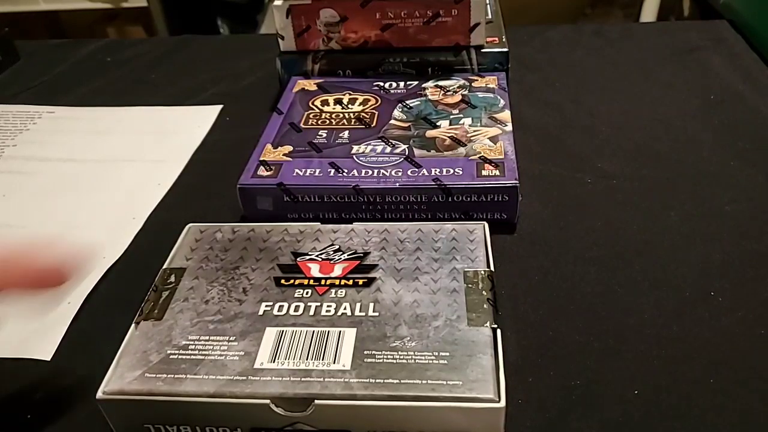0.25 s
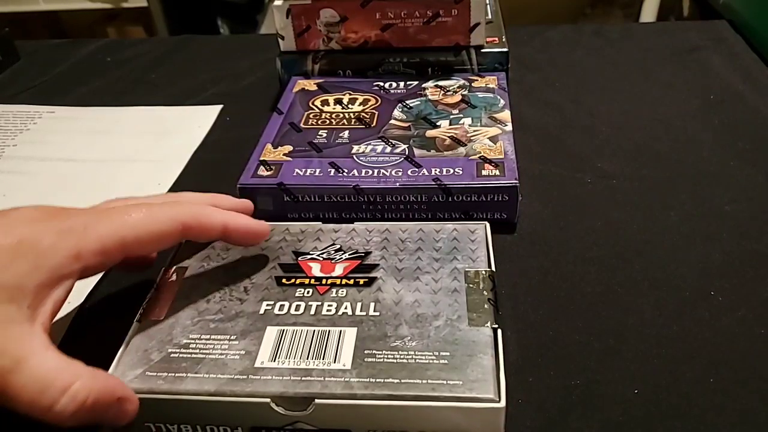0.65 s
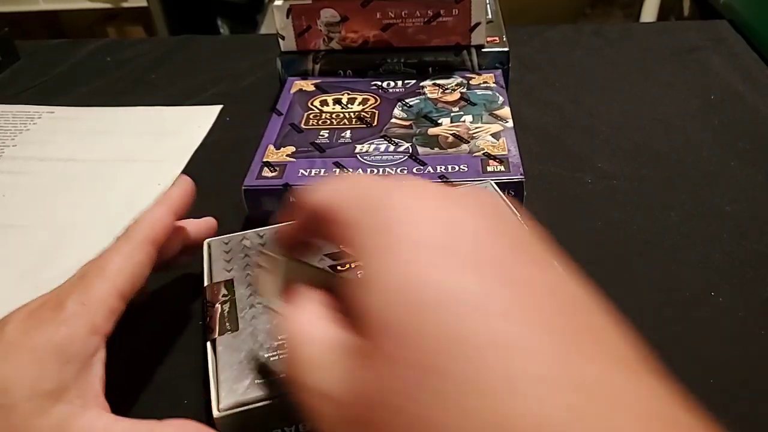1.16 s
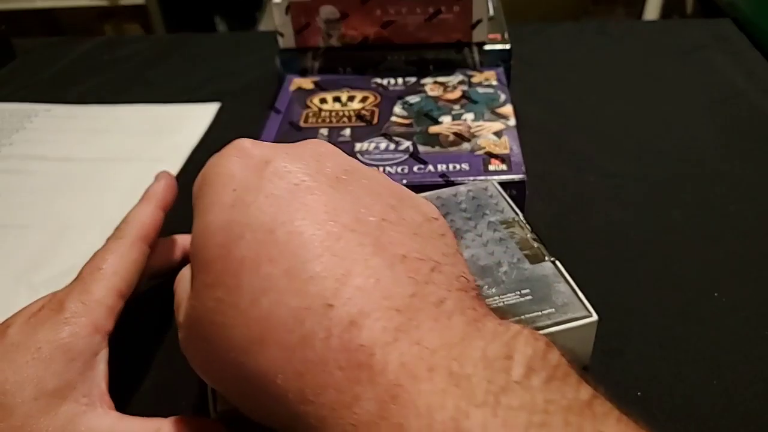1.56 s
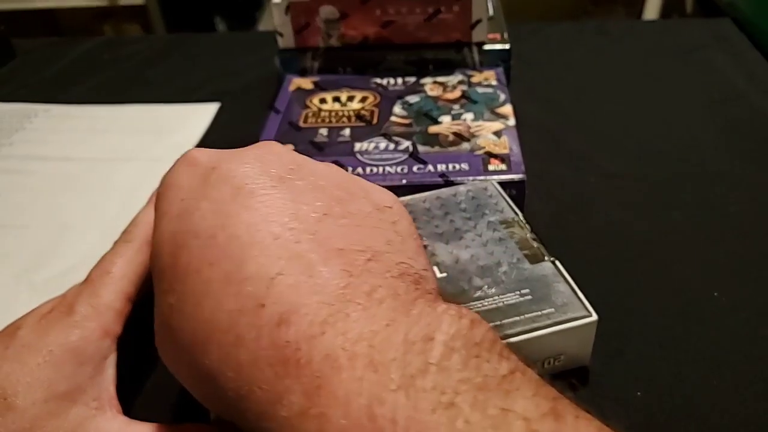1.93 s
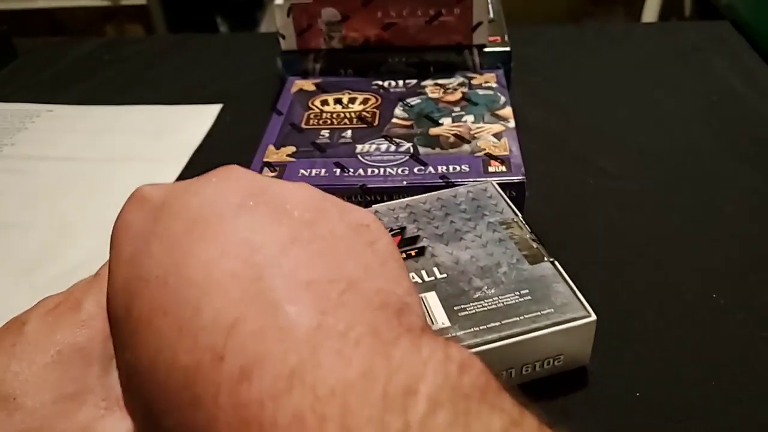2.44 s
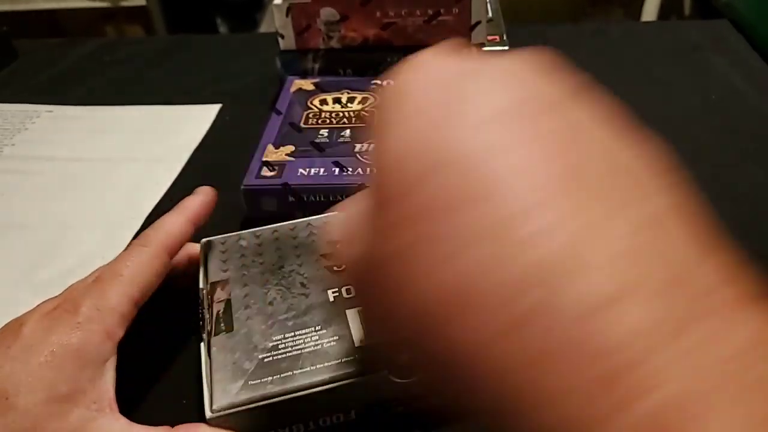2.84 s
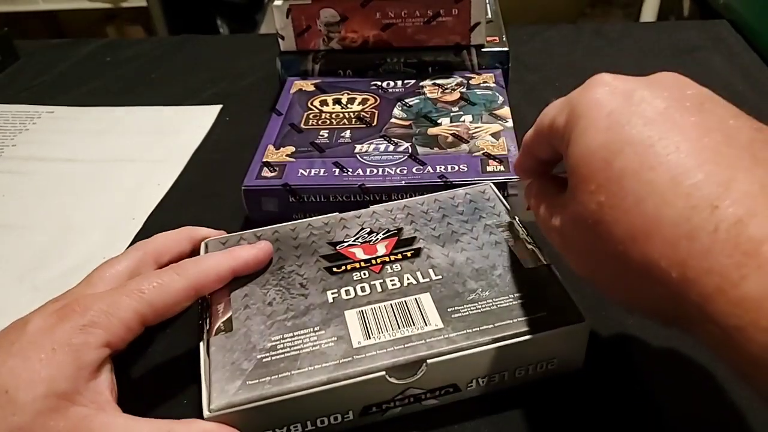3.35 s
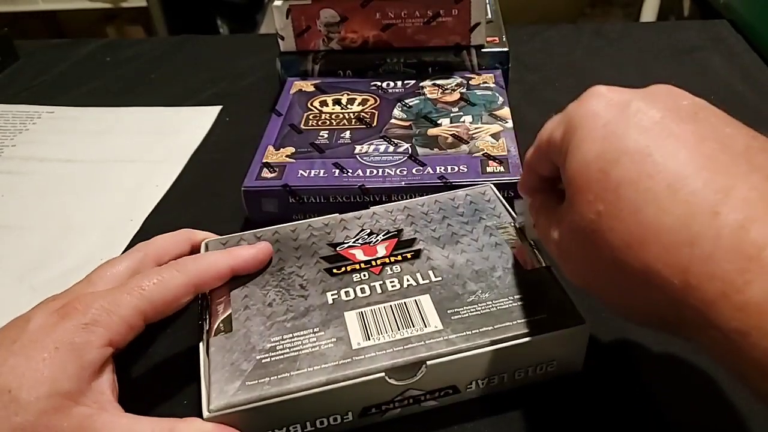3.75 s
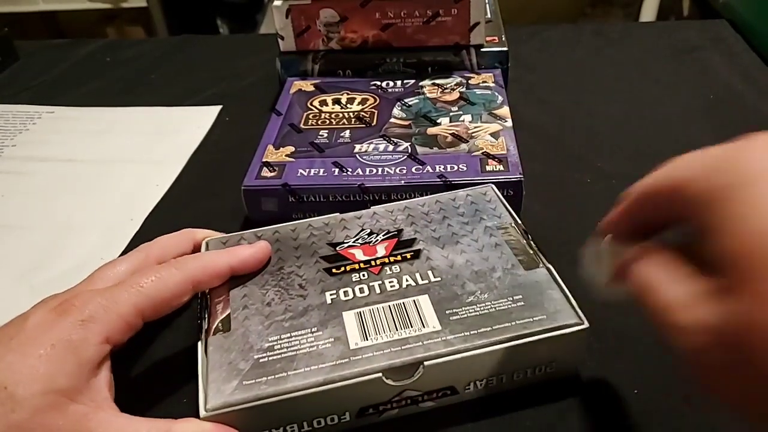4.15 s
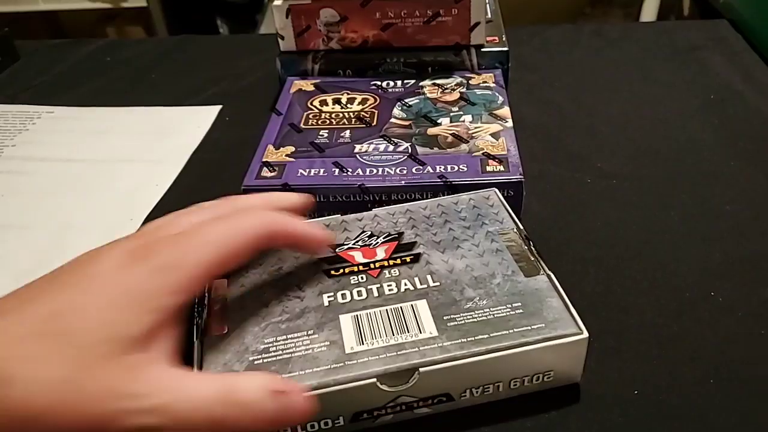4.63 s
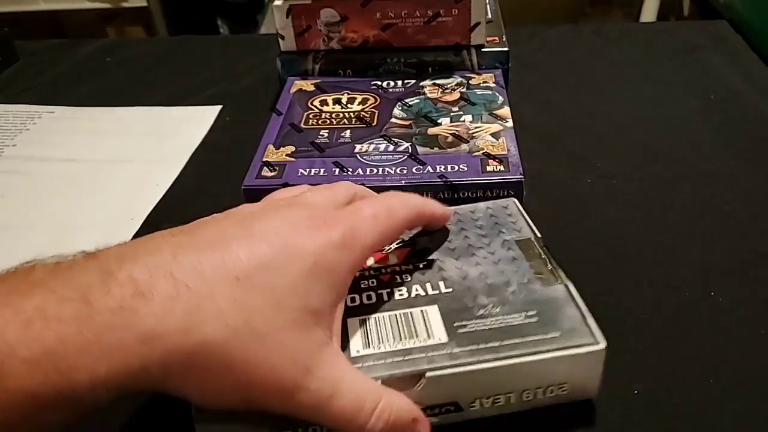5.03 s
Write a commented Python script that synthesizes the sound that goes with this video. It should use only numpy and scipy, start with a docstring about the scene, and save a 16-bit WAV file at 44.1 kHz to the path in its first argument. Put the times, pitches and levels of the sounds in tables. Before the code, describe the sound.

Very quiet background broken by sudden card sounds. Skin brushes a box, a light tap lands, and grainy rubbing follows. Hard bright snaps with a short hollow ring and soft table thump come around the middle. A blade drags softly through a seal, ending in a crack, then the box is set off with a deep boxy knock and a lighter one. Near, dry, hardly any echo.

```python
"""Cardboard box handled on a cloth

Hands slide a small cardboard box over a cloth-covered table, slit its seals with a blade and tap it.
Contacts are short cracks of noise; knocks ring the hollow box and thumps ring the table, as decaying sines.
In between, skin, card and blade rub as grainy noise, and the same box and table modes murmur along."""
import sys
import numpy as np
from scipy import signal
from scipy.io import wavfile
from scipy.ndimage import uniform_filter1d

SR = 44100
rng = np.random.default_rng(int(sys.argv[2]) if len(sys.argv) > 2 else 0)


def volts_from_decibels(level):
    """Turn decibel levels (scalar or array-like) into linear amplitude factors."""
    exponent = np.asarray(level, float) / 20
    return 10 ** exponent


def to_wav(sig):
    """Store sig (one row per channel, or 1-D mono) as 16-bit WAV at the path in sys.argv[1].

    Samples outside -1..1 are clipped; the rate is SR.
    """
    pcm = np.clip(np.atleast_2d(sig), -1, 1) * 32767
    pcm = np.round(pcm).astype(np.int16)
    wavfile.write(sys.argv[1], SR, pcm.T)  # frames by channels


N = 233009   # length in samples

# Faint rustle between strokes. Each row: time in seconds, level in dB, treble tilt in dB per octave.
RUSTLE_PATH = [(0, -58.5, 2.5), (0.4, -65, 1.5), (0.51, -75, 2), (0.7, -68, 1.5), (1.1, -71, -7),
               (1.3, -63, 0), (1.45, -69, 1), (1.62, -83.5, 3.5), (1.78, -69, -1), (1.92, -63, 5),
               (2.2, -67.5, -1), (2.75, -70, 12), (2.86, -68.5, -3.5), (3.05, -73.5, -1.5),
               (3.5, -69.5, -4), (3.63, -72, 0), (4.18, -69.5, -0.5), (4.42, -64.5, 2.5), (4.58, -67, 5.5),
               (4.8, -64.5, 2.5), (5.28, -61.5, 0.5)]
# Tone colour of the rustle. Each row: frequency in Hz, relative level in dB per Hz.
RUSTLE_TONE = [(600, -13.5), (1100, -30.5), (2070, 4), (2300, -15.5), (2590, -12.5), (3200, -6.5),
               (5570, -12.5), (6270, -9), (12000, -23), (14000, -11.5)]
# Weight of the hands on box and table. Each row: time in seconds, box murmur in dB, table rumble in dB.
HAND_WEIGHT = [(0, -60.5, -76), (0.35, -67, -85), (0.7, -86, -69.5), (1.02, -61.5, -70), (1.2, -67, -77),
               (1.5, -70.5, -83), (1.65, -81.5, -85), (2.1, -61, -63), (2.4, -69, -58.5),
               (2.62, -53, -49.5), (2.76, -71.5, -66.5), (3.45, -73, -78), (3.55, -64.5, -62),
               (3.9, -69.5, -90), (4.11, -53.5, -41), (4.17, -76.5, -69), (4.58, -67, -75.5),
               (4.85, -69.5, -70.5), (5.14, -62, -56), (5.225, -43, -50), (5.28, -52, -51)]
# Ringing modes of the table top.
# Each row: frequency in Hz, relative level in dB, time to die by 60 dB when struck in seconds.
TABLE_MODES = [(45, -2.5, 0.26), (72, 0.5, 0.18), (83, 5, 0.024)]
# Ringing modes of the hollow box.
# Each row: frequency in Hz, relative level in dB, time to die by 60 dB when struck in seconds.
BOX_MODES = [(146, -10.5, 0.014), (181.5, -9, 0.13), (252.6, -2, 0.036), (341, -1.5, 0.048),
             (409.5, 0, 0.055), (482.5, -3.5, 0.034), (550, -5, 0.035), (725, -12.5, 0.03),
             (932, -5, 0.025), (1144, -12.5, 0.053), (1290, -12, 0.022)]
# Strokes of skin, card or blade. Each row: start in seconds, end in seconds, hiss at the start in dB,
# hiss at the end in dB, treble tilt in dB per octave.
STROKE_ROWS = [(0., 0.19, -63.5, -66, 0.5), (0.227, 0.317, -57.5, -51, 1.5),
               (0.577, 0.654, -58.5, -72, -0.5), (0.739, 0.948, -53.5, -46.5, 1.5),
               (0.96, 1.026, -51.5, -55.5, 0), (1.079, 1.21, -59, -57, -0.5), (1.795, 1.842, -45, -57, 0.5),
               (1.951, 2.066, -69.5, -48.5, 2), (2.419, 2.582, -62, -47.5, -0.5),
               (2.634, 2.673, -54, -44, -2), (2.777, 2.815, -63, -55, 2), (2.875, 2.884, -50, -59, 1.5),
               (2.919, 2.986, -52.5, -60, 1), (3.704, 3.713, -41, -46, 1.5), (3.712, 3.997, -57, -53, 0),
               (3.96, 4.117, -54.5, -45.5, -1), (4.438, 4.446, -64.5, -43, 4),
               (4.442, 4.462, -48.5, -53.5, 4), (4.871, 4.902, -51, -63.5, 4.5),
               (4.93, 5.066, -58, -56.5, 3.5), (5.156, 5.263, -63, -64, -1.5)]
# Tone colour of the strokes. Each row: frequency in Hz, relative level in dB per Hz.
STROKE_TONE = [(600, 0), (791, -18), (903, -0.5), (1380, -7.5), (1720, 0.5), (2460, 0), (8370, -6),
               (12800, -14.5), (14000, -3.5)]
# The dragged blade sets one panel humming.
# The one row: start in seconds, end in seconds, resonance in Hz, width of the resonance in Hz.
SLIT_HUM = (3.72, 3.97, 1020, 190)
# Pushes that reach the table top. Each row: time in seconds, strength in dB.
TABLE_PUSHES = [(0.951, -50.5), (2.048, -58.5), (2.251, -29.5), (2.526, -38), (2.671, -39.5),
                (3.004, -47.5), (3.694, -54.5), (3.987, -33.5), (4.602, -30.5), (4.922, -41.5)]
# Knocks that ring the box; where it is struck and held decides which modes speak.
# Each row: time in seconds, strength in dB, favoured frequency in Hz.
BOX_KNOCKS = [(0.9348, -32.5, 990), (1.163, -48, 402), (1.782, -55, 300), (2.0578, -35, 200),
              (2.261, -26, 460), (2.5371, -25, 500), (2.591, -57, 432), (2.6709, -35, 600),
              (2.69, -52, 300), (2.836, -57.5, 400), (2.9961, -50.5, 242), (3.529, -55, 300),
              (3.7009, -43, 1000), (3.9865, -30, 1000), (4.011, -41, 453), (4.095, -45, 903),
              (4.1057, -45.5, 346), (4.603, -16, 278), (4.6071, -17, 303), (4.9226, -20.5, 262),
              (4.936, -36, 300), (5.244, -46, 350)]
# Cracks of card, seal or blade. Each row: time in seconds, peak level in dB, centre frequency in Hz,
# broad treble in dB relative to the burst at the centre.
CRACK_ROWS = [(0.2053, -36, 3160, 8), (0.295, -25, 3030, 8), (0.3653, -51, 2760, -17),
              (0.3833, -42.5, 2840, -14), (0.4338, -51, 2800, -18), (0.447, -50, 2820, -18),
              (0.5795, -49.5, 2870, -15), (0.746, -40, 3680, -14), (0.9351, -19, 1760, -9),
              (1.0613, -27, 6700, -4), (1.1296, -35, 6300, -34), (1.1562, -35, 2740, -33),
              (1.1654, -31, 1830, 8), (1.3021, -36.5, 1600, -37), (1.3633, -36, 2750, -42),
              (1.4147, -42.5, 2570, -3), (1.7177, -42, 6280, 0.5), (1.7533, -43, 4050, 11),
              (1.781, -34, 3600, -31), (2.0582, -30, 3630, 3), (2.2528, -23, 2200, 5),
              (2.2564, -5.5, 2230, 6.5), (2.416, -44, 4000, -3), (2.4404, -26.5, 3760, 15),
              (2.453, -36, 3540, 1), (2.5362, -6, 2980, -3), (2.5835, -21.5, 3130, -1.5),
              (2.587, -30, 2980, -5), (2.6713, -25, 1100, -10), (2.7042, -30.5, 3440, 10),
              (2.711, -37, 3530, 1), (2.836, -39, 1470, -28), (2.8645, -30.5, 6140, -32),
              (2.9185, -38.5, 6100, -15), (2.964, -46, 2530, -12), (2.9963, -44.5, 1780, -17),
              (3.455, -49, 3800, -26), (3.496, -42.5, 3860, -32.5), (3.617, -39.5, 3180, 9),
              (3.7005, -31, 3500, -2), (3.876, -31, 4640, 3), (3.9855, -9, 3200, 3),
              (4.0138, -17.5, 4850, -2), (4.095, -38.5, 925, -22), (4.1062, -38, 1840, -16),
              (4.4432, -43, 1850, -1), (4.603, -5.5, 1400, 14), (4.6071, -9.5, 1600, -7.5),
              (4.9231, -14, 2830, 11), (4.9311, -21.5, 2900, 0)]

STROKE_RISE_DB_PER_S, STROKE_FALL_DB_PER_S = 1500, 544
BLOW_SPREAD_DB = 2.0   # chance differences between blows, mode by mode


def rms_one(x):
    """Scale to unit rms."""
    return x / np.sqrt(np.mean(x ** 2) + 1e-20)


def filtered(x, order, hz, kind="low"):
    """Butterworth filter: lets through only the chosen range of frequencies."""
    return signal.sosfilt(signal.butter(order, hz, kind, fs=SR, output="sos"), x)


def in_time(rows):
    """Table columns joined by straight lines, sample by sample."""
    seconds, *columns = np.transpose(rows)
    return [np.interp(np.arange(N) / SR, seconds, column) for column in columns]


def drift(rate_hz):
    """Slow random wander of spread 1: noise smoothed twice, worked out at every 40th sample."""
    r = np.exp(-80 * np.pi * rate_hz / SR)
    noise = rng.standard_normal(N // 40 + 2002)
    slow = signal.lfilter([1], [1, -2 * r, r * r], noise)[2000:]   # skip the settling
    return np.interp(np.arange(N) / 40, np.arange(len(slow)), rms_one(slow))


def ring(force, hz, t60):
    """One mode: a unit click sets a sine ringing from height 1, dying by 60 dB in t60 seconds."""
    r = volts_from_decibels(-60 / (t60 * SR))
    w = 2 * np.pi * hz / SR
    return signal.lfilter([0, np.sin(w)], [1, -2 * r * np.cos(w), r * r], force + 1e-18)


def rubbed(modes, force):
    """A rough steady force keeps the modes murmuring; rms 1."""
    return rms_one(sum(volts_from_decibels(level_db) * ring(force, hz, t60) for hz, level_db, t60 in modes))


def struck(modes, times, blow_db, contact_hz, rattle=0., rattle_t60=.03, octaves_away=None):
    """Every blow strikes every mode with a strength of its own; loose contents rattle on after the push."""
    starts = np.round(times * SR).astype(int)
    t = np.arange(5000) / SR
    pushes = rattle * rng.standard_normal((len(starts), len(t))) * volts_from_decibels(-60 * t / rattle_t60)
    pushes[:, 0] = -1   # the blow itself
    luck = rng.standard_normal((len(modes), len(starts)))
    out = 0
    for k, (hz, level_db, t60) in enumerate(modes):
        mode_db = blow_db + level_db + BLOW_SPREAD_DB * luck[k]
        if octaves_away is not None:
            mode_db = mode_db - 10.5 * octaves_away[k]   # modes away from the favoured pitch speak less
        force = np.zeros(N + len(t))
        for start, gain, push in zip(starts, volts_from_decibels(mode_db), pushes):
            force[start:start + len(t)] += gain * push
        out = out + ring(force[:N], hz, t60)
    return filtered(out, 2, contact_hz)


def grains(per_s, spread_db, smooth):
    """Fibres catch and let go at random over a smooth friction noise."""
    sizes = volts_from_decibels(spread_db * np.minimum(rng.exponential(1, N), 5))
    clicks = sizes * rng.choice([-1, 1], N) * (rng.random(N) < per_s / SR)
    return rms_one(clicks) + smooth * rng.standard_normal(N)


def hiss(colour, tilt_db, together_db, patchy_db):
    """Skin and card sliding: grainy noise in third-octave bands that flicker together and in patches."""
    forces = [grains(460.0, 3.8, smooth=1.2) for _ in range(2)]
    together = together_db * drift(38.0)
    edges = 600 * 2 ** (np.arange(15) / 3)
    colour_hz, colour_level_db = np.transpose(colour)
    out = 0
    for k, (low, high) in enumerate(zip(edges, edges[1:])):
        hz = np.sqrt(low * high)
        band_db = np.interp(np.log(hz), np.log(colour_hz), colour_level_db) + tilt_db * np.log2(hz / 4000)
        flicker_db = together + patchy_db * drift(10.0)
        band = filtered(forces[k % 2], 2, [low, high], "band")   # neighbouring bands use different grains
        out = out + volts_from_decibels(band_db + flicker_db) * band
    # even out the loudness: the level belongs to the hand
    return out / np.sqrt(uniform_filter1d(out ** 2, size=2048) + 1e-20)


def room(x):
    """Close walls and clutter: a short tail of noise whose treble dies first, swallowed by the cloth."""
    t = np.arange(SR // 3) / SR
    noise = rng.standard_normal(len(t))
    low = filtered(noise, 1, 1600)
    tail = low * volts_from_decibels(-60 * t / 0.14) + (noise - low) * volts_from_decibels(-60 * t / 0.091)   # 60 dB fall times in seconds
    tail = tail * (t > .004)   # nothing returns in the first 4 ms
    return signal.fftconvolve(x, tail / np.sqrt(np.sum(tail ** 2)))[:N]


def rustle():
    """Faint grainy friction noise that goes on between the strokes."""
    level_db, tilt_db = in_time(RUSTLE_PATH)
    return volts_from_decibels(level_db) * hiss(RUSTLE_TONE, tilt_db, together_db=1.24, patchy_db=3.0)


def table_rumble():
    """The weight of the hands keeps the table modes rumbling, damped to die sooner than when struck."""
    _, rumble_db = in_time(HAND_WEIGHT)
    damped = [(hz, db, 0.65 * t60) for hz, db, t60 in TABLE_MODES]
    return volts_from_decibels(rumble_db) * rubbed(damped, rng.standard_normal(N))


def box_murmur(stroke_gain):
    """Cloth and fingers rub and damp the box modes; the broad hand moves those near 300 Hz most."""
    murmur_db, _ = in_time(HAND_WEIGHT)
    damped = [(hz, db - 4.0 * abs(np.log2(hz / 300.)), 0.27 * t60) for hz, db, t60 in BOX_MODES]
    leaning = volts_from_decibels(murmur_db + 1 * drift(11.0))   # uneven grip makes the murmur lumpy
    along = volts_from_decibels(-19.5) * stroke_gain   # the box murmurs along with each stroke
    return (leaning + along) * rubbed(damped, grains(210.0, 1.3, smooth=1.4))


def stroke_motion():
    """Each stroke sets in fast, glides from first to last level and falls away; returns gain and tilt."""
    t = np.arange(N) / SR
    power, tilted = 1e-14, 0
    for start, end, start_db, end_db, tilt_db in STROKE_ROWS:
        level_db = np.interp(t, [start, end], [start_db, end_db])
        level_db = level_db - STROKE_RISE_DB_PER_S * np.maximum(start - t, 0)
        level_db = level_db - STROKE_FALL_DB_PER_S * np.maximum(t - end, 0)
        stroke_power = volts_from_decibels(2 * level_db)
        power = power + stroke_power
        tilted = tilted + tilt_db * stroke_power
    return np.sqrt(power), tilted / power   # where strokes overlap, the louder one sets the tilt most


def rubs(stroke_gain, tilt_db):
    """Strokes of skin, card or blade: friction hiss that follows the moving hand."""
    return stroke_gain * hiss(STROKE_TONE, tilt_db, together_db=2.5, patchy_db=1.84)


def slit():
    """Friction noise in one panel resonance while the blade drags through the seal."""
    start, end, hz, width_hz = SLIT_HUM
    t = np.arange(N) / SR
    outside_s = np.maximum(np.maximum(start - t, t - end), 0)
    t60 = np.log(1000) / (np.pi * width_hz)   # a wider resonance dies sooner
    hum = rms_one(ring(grains(300.0, 4.9, smooth=1.6), hz, t60))
    return volts_from_decibels(-61.5 - STROKE_FALL_DB_PER_S * outside_s) * hum


def table_thumps():
    """Pushes that reach the table top ring its modes, with all but the bass softened."""
    push_s, push_db = np.transpose(TABLE_PUSHES)
    return struck(TABLE_MODES, push_s, push_db, contact_hz=77.0)


def box_knocks():
    """Knocks ring the hollow box, strongest near a favoured pitch, and its loose contents rattle on."""
    knock_s, knock_db, favoured_hz = np.transpose(BOX_KNOCKS)
    octaves_away = [np.abs(np.log2(hz / favoured_hz)) for hz, _, _ in BOX_MODES]
    box = struck(BOX_MODES, knock_s, knock_db, 2100.0, rattle=0.049, rattle_t60=0.13,
                 octaves_away=octaves_away)
    return filtered(box, 2, 95, "high")   # a small box radiates little below this


def cracks():
    """Card or seal snaps: a click and a dying noise burst around its own centre, plus some broad treble."""
    rise_s, click = 0.0001, 1.65
    t = np.arange(4096) / SR
    out = np.zeros(N + len(t))
    for seconds, peak_db, hz, treble_db in CRACK_ROWS:
        # faint contacts are scuffs and last longer
        t60 = 0.012 + 0.002 * max(-33.0 - peak_db, 0)
        burst = rng.standard_normal(len(t)) * (1 - np.exp(-t / rise_s)) * volts_from_decibels(-60 * t / t60)
        burst[round(2 * rise_s * SR)] -= click
        # harder snaps shake more of the card, so their band is wider
        width = 1.3351 + 0.0071 * max(peak_db + 45.5, 0)
        centre = rms_one(filtered(burst, 2, [hz / width, hz * width], "band"))
        treble = rms_one(filtered(burst, 2, [1800., 10500.], "band"))
        snap = centre + volts_from_decibels(treble_db) * treble
        at = round(seconds * SR)
        out[at:at + len(t)] += volts_from_decibels(peak_db) * snap / np.abs(snap).max()
    return out[:N]


def scene():
    """Contacts and rubbing, with the room around the cracks."""
    stroke_gain, stroke_tilt_db = stroke_motion()
    background = rustle() + table_rumble() + box_murmur(stroke_gain)
    rubbing = rubs(stroke_gain, stroke_tilt_db) + slit()
    snaps = cracks()
    hits = table_thumps() + box_knocks() + snaps + volts_from_decibels(-9.5) * room(snaps)
    return (background + rubbing + hits)[None]


def band_limit(x):
    """A steep low-pass at the top of the band."""
    return signal.sosfilt(signal.butter(12, 14960, fs=SR, output="sos"), x)


def record(dry):
    """The microphone drops the deep bass, and the top is cut steeply."""
    bass_cut = filtered(dry, 4, 42., "high")
    top_cut = signal.cheby2(12, 45, 14500, fs=SR, output="sos")
    finished = signal.sosfilt(top_cut, bass_cut)
    return band_limit(finished)


dry = scene()
out = record(dry)
to_wav(out)
```